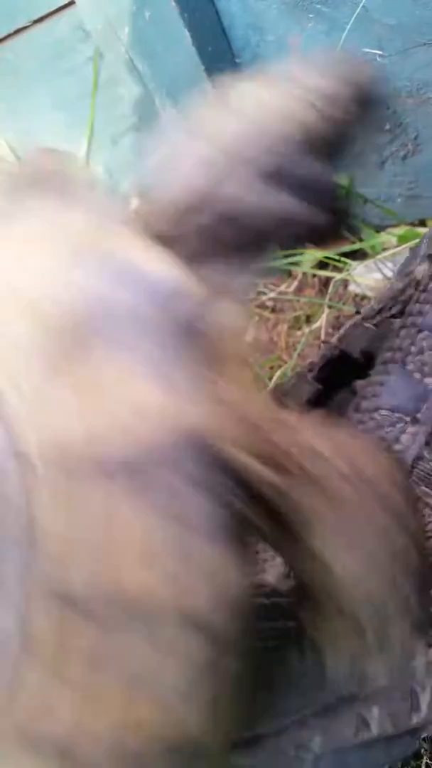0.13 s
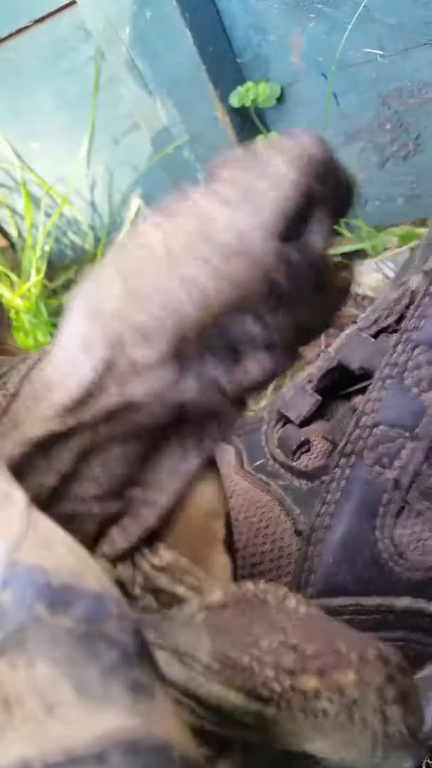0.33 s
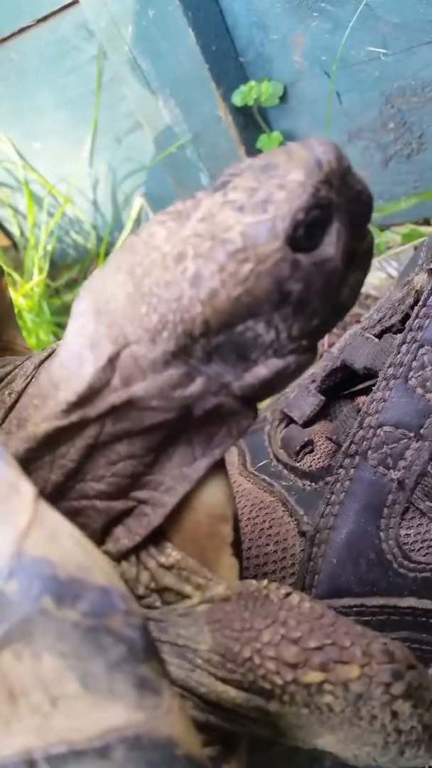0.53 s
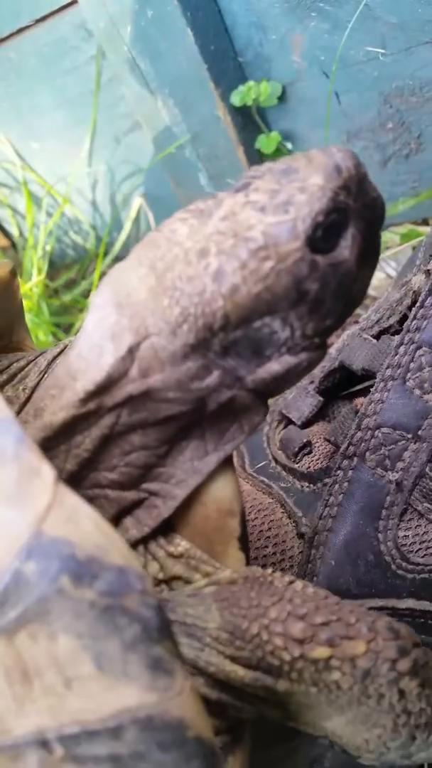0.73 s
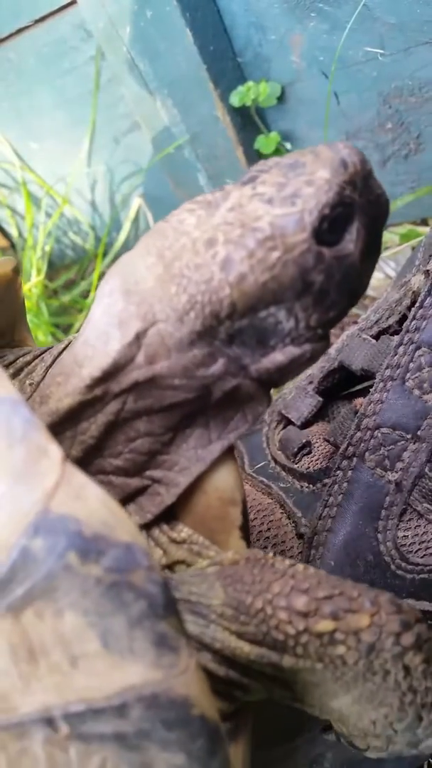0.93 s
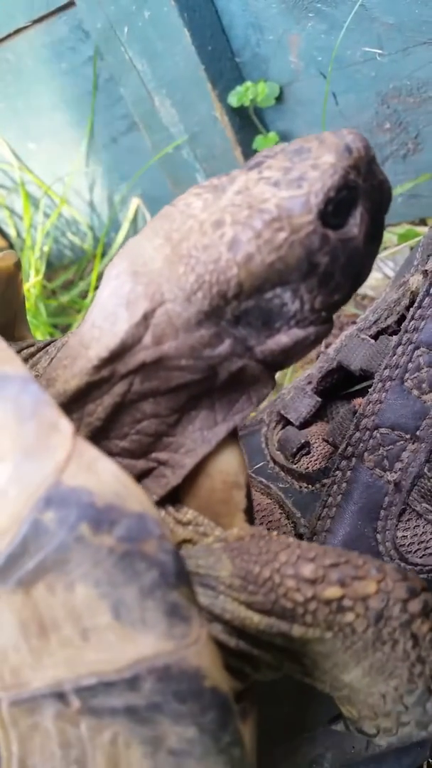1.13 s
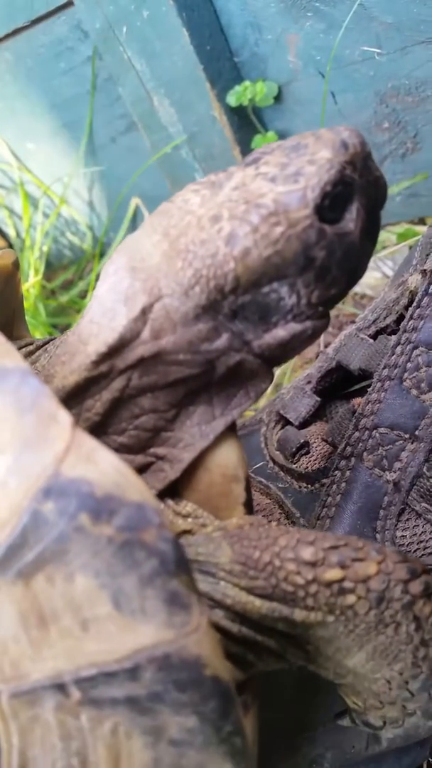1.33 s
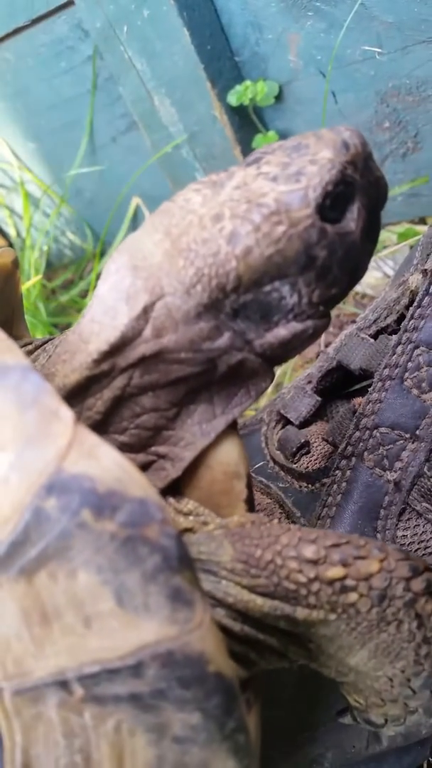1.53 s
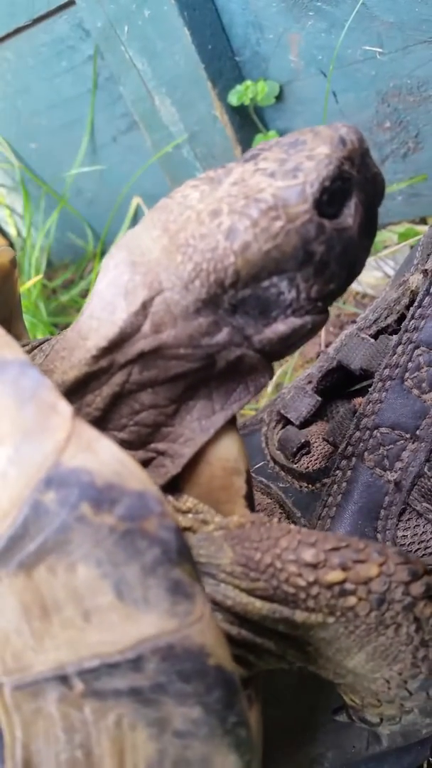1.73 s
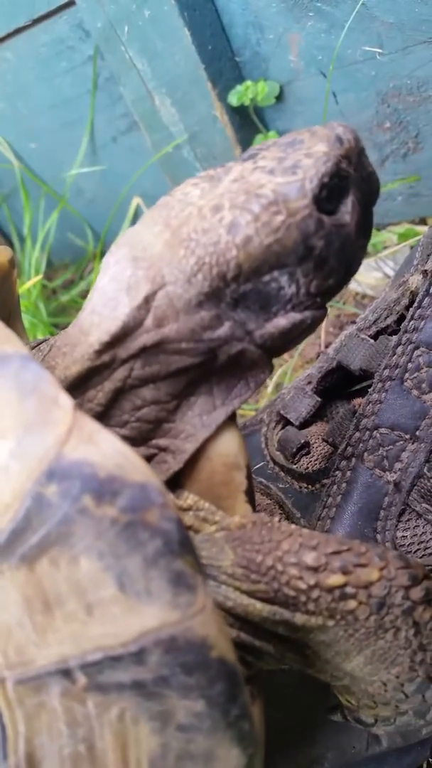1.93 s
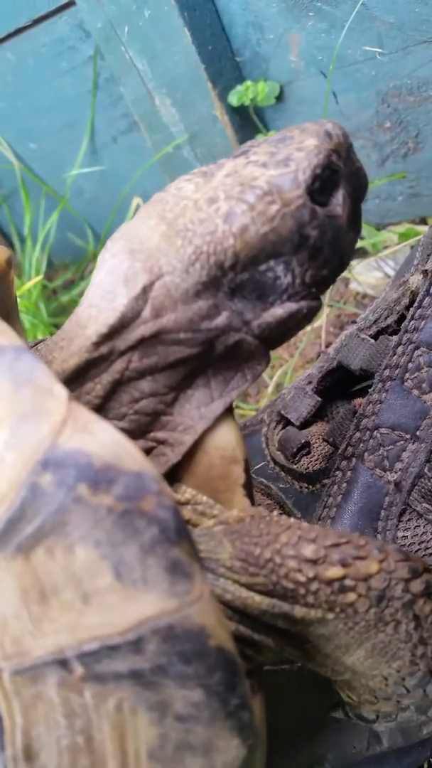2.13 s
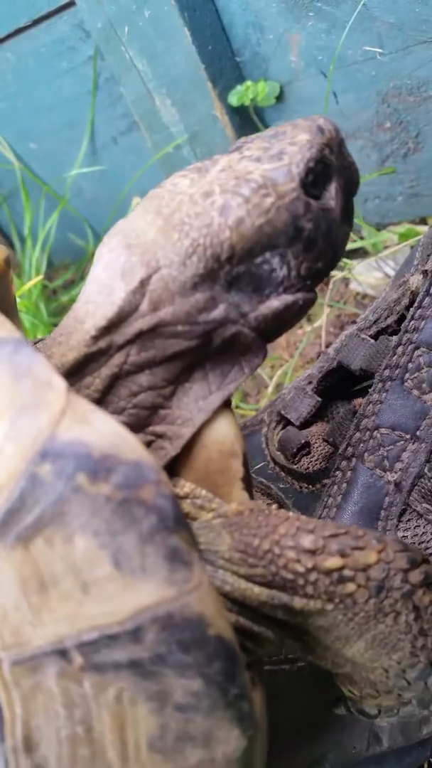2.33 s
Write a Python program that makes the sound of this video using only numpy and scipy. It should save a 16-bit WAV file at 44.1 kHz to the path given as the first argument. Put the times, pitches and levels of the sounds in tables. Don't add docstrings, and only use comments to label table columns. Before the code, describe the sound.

One close, nasal tortoise squeak slides down into spent breath, over faint birdsong and low rumble

```python
import sys
import numpy as np
from scipy import signal
from scipy.fft import rfft, irfft
from scipy.io import wavfile
from scipy.ndimage import uniform_filter1d

SR = 44100
rng = np.random.default_rng(int(sys.argv[2]) if len(sys.argv) > 2 else 0)


def int16_out(signal):
    q = np.round(np.clip(np.atleast_2d(signal).T, -1, 1) * 32767)
    wavfile.write(sys.argv[1], SR, q.astype(np.int16))


def volts_from_decibels(level):
    exponent = np.asarray(level, float) / 20
    return 10 ** exponent


N = 110250
TIME = np.arange(N) / SR
FREQ = np.arange(N // 2 + 1) * SR / N


def level(x, db):
    return x * volts_from_decibels(db) / np.sqrt(np.mean(x ** 2))


def along(table, at, column=1):
    return np.interp(at, np.array(table)[:, 0], np.array(table)[:, column])


def noise(colour):
    hz, db = np.array(colour).T
    gain = volts_from_decibels(np.interp(np.log(FREQ + 1), np.log(hz), db, left=-90, right=-90))
    white = rng.standard_normal(N)
    return level(irfft(rfft(white) * gain, N), 0)


def walk(rate):
    hold = int(SR / rate)
    steps = np.repeat(rng.standard_normal(N // hold + 1), hold)[:N]
    return 1.3 * uniform_filter1d(uniform_filter1d(steps, hold), hold)


def pan(x, db):
    return x * volts_from_decibels(np.array([[db], [-db]]) / 2)


# f/Hz, density/dB
TOWN_COLOUR = [(14, -43.5), (40, -13.5), (67, 3), (88, -8.5), (255, -16.5), (320, -23.5), (520, -27),
               (1500, -48.5), (1950, -68.5)]
# f/Hz, density/dB
HISS_COLOUR = [(470, -31.5), (800, -4), (2620, -18.5), (3360, -16), (5270, -19), (6680, -19), (7570, -46),
               (12900, -22), (15800, -16)]
# t/s, level/dB
RUMBLE_LEVEL = [(0, -57), (.12, -50.5), (.55, -52.5), (.9, -56), (1.13, -57), (1.19, -51), (1.36, -54.5),
                (1.45, -49), (1.6, -51), (1.98, -53.5), (2.07, -50.5), (2.12, -52), (2.17, -50),
                (2.22, -50.5), (2.29, -48), (2.5, -52.5)]
# t/s, level/dB
MURMUR_LEVEL = [(0, -57), (1.05, -56), (1.25, -63), (1.55, -60), (1.9, -63.5), (2.1, -62.5), (2.5, -62.5)]
TOWN_ALIKE, SPLIT_HZ = 0.67, 164
GUST_DB, GUSTS_PER_S = 0.78, 9.22
HISS_DB, HISS_LEFT_DB = -67.5, 2


def garden():
    common = np.sqrt((1 + TOWN_ALIKE) / 2) * noise(TOWN_COLOUR)
    opposed = np.sqrt((1 - TOWN_ALIKE) / 2) * noise(TOWN_COLOUR)
    town = rfft(common + opposed * np.array([[1], [-1]]))
    deep = 1 / (1 + (FREQ / SPLIT_HZ) ** 6)
    murmur = level(irfft(town * (1 - deep), N), 0)
    murmur = murmur * volts_from_decibels(along(MURMUR_LEVEL, TIME) + 0.5 * walk(13.82))
    rumble = level(irfft(town * deep, N), 3.6)
    rumble = rumble * volts_from_decibels(along(RUMBLE_LEVEL, TIME) + GUST_DB * walk(GUSTS_PER_S))
    hiss = np.array([noise(HISS_COLOUR), noise(HISS_COLOUR)])
    hiss = hiss * pan(0.63, HISS_LEFT_DB) * volts_from_decibels(walk(12.0))
    return rumble + murmur + hiss * volts_from_decibels(HISS_DB)


# t/s, length/s, start f/Hz, end f/Hz, level/dB
WHISTLES = [(0.109, 0.059, 5640, 5760, -68.5), (0.725, 0.025, 6100, 6800, -68),
            (0.745, 0.039, 6800, 6380, -76), (0.842, 0.12, 4170, 4223, -74.5),
            (1.0, 0.094, 4300, 4070, -83), (1.008, .12, 7900, 7770, -84), (1.12, 0.17, 7660, 7460, -90),
            (1.097, 0.027, 3900, 3900, -80.5), (1.227, 0.055, 5020, 4170, -74),
            (1.33, 0.038, 6680, 6600, -77), (1.413, 0.028, 4340, 5470, -76),
            (1.426, 0.094, 6510, 6080, -74), (1.557, 0.019, 4500, 5250, -77),
            (1.568, 0.11, 6310, 6410, -75), (1.712, 0.044, 6290, 6530, -72),
            (1.751, 0.092, 6150, 6330, -80), (1.725, 0.02, 3730, 3910, -77), (1.85, 0.015, 4650, 5000, -81),
            (1.865, 0.07, 6600, 6500, -78.5), (2.074, 0.23, 6710, 6790, -81.5),
            (2.23, 0.014, 5100, 5300, -81)]
WARBLE_HZ, BIRD_FLUTTER_DB, LEAF_ECHO_DB, BIRDS_DB = 60, 2.5, 2, -2.5


def birds():
    song = np.zeros(N)
    warble = WARBLE_HZ * walk(130)
    flutter = volts_from_decibels(BIRD_FLUTTER_DB * walk(60.12))
    for start, length, from_hz, to_hz, db in WHISTLES:
        u = np.clip((TIME - start) / length, 0, 1)
        hz = from_hz + (to_hz - from_hz) * u + warble
        swell = np.abs(np.sin(np.pi * u)) ** .5
        song += volts_from_decibels(db) * swell * np.sin(2 * np.pi * np.cumsum(hz) / SR)
    tail = rng.standard_normal((2, 4000)) * np.exp(-np.arange(4000) / 4700.0)
    tail *= volts_from_decibels(LEAF_ECHO_DB) / np.sqrt((tail ** 2).sum(axis=1, keepdims=True))
    echo = signal.fftconvolve(song[None], tail)[:, :N]
    return volts_from_decibels(BIRDS_DB) * (np.sqrt(2) * song * flutter + echo)


# t/s, length/s, level/dB, centre f/Hz, left minus right/dB
SCUFF_EVENTS = [
    (.148, .007, -63, 2500, 2),
    (.335, .05, -47, 1000, 0),
    (.4865, .004, -46, 1700, 6),
    (.845, .012, -76, 2600, 0),
    (.889, .025, -58, 500, 0),
    (1.46, .05, -62, 650, -2),
    (1.5, .13, -67, 900, 2),
    (1.68, .06, -77, 3500, 2),
    (2.03, .06, -58, 350, 0),
]


def scuffs():
    out = np.zeros((2, N))
    for start, length, db, hz, side_db in SCUFF_EVENTS:
        u = np.clip((TIME - start) / length, 0, 1)
        colour = [(hz / 5, -12), (hz, 0), (hz * 4, -22)]
        rub = np.array([noise(colour), noise(colour)])
        out += pan(rub, side_db) * volts_from_decibels(db + 2 * walk(180)) * np.sin(np.pi * u ** 0.55)
    return out


# t/s, f/Hz, fundamental level/dB, overtone tilt/dB per overtone
SQUEAK_PATH = [
    (.17, 671, -69, -1),
    (.177, 661, -43, 0.5),
    (.197, 618, -34, 0.02),
    (.235, 614, -28, 0),
    (.245, 570.4, -23.5, 0.14),
    (.33, 543.8, -23.5, 0),
    (.375, 515.7, -26, 0),
    (.416, 485, -31, -0.64),
    (.428, 482, -48, -6),
]
# level/dB, for four states of the glottis
TIGHT_GLOTTIS = [-5, -23, -22, -24, -24, -26, -36, -30, -42, -29, -53, -53]
OPEN_GLOTTIS = [-20, -23, -26, -32, -27, -38, -36, -29, -32, -43, -39, -49]
TIRED_GLOTTIS = [-16, -19, -17, -27, -14, -28, -31, -42, -28, -40, -36, -36]
SPENT_GLOTTIS = [-16, -15, -18, -33, -38, -26, -33, -40, -32, -40, -40, -40]
BREAK_S, BREAK_LENGTH_S = .24, .007
TIRES_S, TIRES_LENGTH_S = 0.3, 0.039
FADES_S, FADES_LENGTH_S = 0.361, 0.055
SHIMMER_DB, JITTER = .33, .0015


def squeak():
    phase = 2 * np.pi * np.cumsum(along(SQUEAK_PATH, TIME) * (1 + JITTER * walk(150))) / SR
    opened = np.clip((TIME - BREAK_S) / BREAK_LENGTH_S + .5, 0, 1)
    tired = np.clip((TIME - TIRES_S) / TIRES_LENGTH_S + .5, 0, 1)
    spent = np.clip((TIME - FADES_S) / FADES_LENGTH_S + .5, 0, 1)
    tilt = along(SQUEAK_PATH, TIME, column=3)
    tone = np.sin(phase)
    states = zip(TIGHT_GLOTTIS, OPEN_GLOTTIS, TIRED_GLOTTIS, SPENT_GLOTTIS)
    for k, (a, b, c, d) in enumerate(states, start=2):
        db = a + (b - a) * opened + (c - b) * tired + (d - c) * spent
        db = db + k * tilt + k * SHIMMER_DB * walk(42.8)
        tone = tone + volts_from_decibels(db) * np.sin(k * phase + k * k)
    sounding = (TIME > SQUEAK_PATH[0][0]) * (TIME < SQUEAK_PATH[-1][0])
    return np.sqrt(2) * tone * volts_from_decibels(along(SQUEAK_PATH, TIME, column=2)) * sounding


# f/Hz, width/Hz, level/dB
THROAT_MODES = [(3300, 470, 10.5), (6800, 810, 3.5), (7960, 350, -14), (9700, 400, -12), (12000, 1250, 11)]


def throat_db(hz):
    return sum(db / (1 + (2 * (hz - f) / width) ** 2) for f, width, db in THROAT_MODES)


# t/s, level/dB, brightness/dB
BREATH_PATH = [
    (.17, -90, -5.5),
    (.185, -58, -4),
    (.25, -49, -5),
    (.3, -46.5, 1.5),
    (.385, -39.5, 7),
    (.425, -45, 4.5),
    (.49, -44.5, -3),
    (.55, -59.5, -4),
    (.85, -77, -4),
]
# f/Hz, level/dB
AIR_COLOUR = [(300, 2.5), (900, -1.5), (1600, -6), (2900, -10.5), (5200, -4.5), (7200, -9.5), (9200, -18.5),
              (13000, -9.5), (16000, -17.5)]
AIR_FLUTTER_DB = 2.3


def breath():
    air = rfft(noise(AIR_COLOUR)) * volts_from_decibels(throat_db(FREQ))
    brightness = along(BREATH_PATH, TIME, column=2)
    out = 0
    for band in range(8):
        part = irfft(air * (FREQ // 2000 == band), N)
        treble = np.clip((band - 1) / 3, 0, 1)
        out = out + part * volts_from_decibels(treble * brightness + AIR_FLUTTER_DB * walk(35))
    sounding = (TIME > BREATH_PATH[0][0]) * (TIME < BREATH_PATH[-1][0])
    return out * volts_from_decibels(along(BREATH_PATH, TIME)) * sounding


# f/Hz, level/dB, lag/rad
PORT_TRANSFER = [(100, -1, .3), (547, 1, .5), (620, 2.5, 1), (1080, -5, 2.9), (1240, -6, 2.7),
                 (1650, -9, 4.4), (1850, -3, 5.2), (2120, -8, 4.3), (2250, 0, 4.5), (2480, -5, 5),
                 (2800, 1, 5.8), (3080, -2, 6.5), (3190, -8, 7.3), (3300, -7, 8.8), (3400, -9, 9),
                 (3700, -2, 13), (3950, 5, 11.8), (4350, -9, 15), (5000, 13, 15.4), (5110, 12, 14),
                 (5290, -3, 16.4), (5470, 3, 15.3), (5550, 10, 16.5), (5680, 6, 16.3), (6200, 2, 14),
                 (6800, -8, 19), (11570, -11, 34), (15200, -5, 37)]
AIR_ALIKE = .6


def tortoise():
    voice, air = squeak(), breath()
    other = AIR_ALIKE * air + np.sqrt(1 - AIR_ALIKE ** 2) * breath()
    shade = volts_from_decibels(along(PORT_TRANSFER, FREQ))
    lag = np.exp(-1j * along(PORT_TRANSFER, FREQ, column=2))
    right = (rfft(voice) * shade + rfft(other) * np.minimum(shade, 1)) * lag
    return np.array([voice + air, irfft(right, N)])


# t/s, peak level/dB, f/Hz, t60/s, left minus right/dB
SHELL_KNOCKS = [(.234, -25, 178, 0.022, -7.5), (.244, -27.5, 105.6, .1, 15.5), (0.268, -21, 102, .1, 11),
                (0.349, -34, 262, 0.13, 12), (0.357, -24, 155.6, 0.022, 9.5), (0.377, -29, 98.5, 0.14, 8),
                (0.414, -28, 79.45, 0.097, 5), (0.433, -21, 89, 0.055, 8), (0.4871, -27.5, 470, 0.0091, 23),
                (0.489, -34, 111.4, 0.083, 16.5), (.892, -43, 436, 0.057, -6),
                (.899, -46.5, 442, 0.059, -1), (.893, -52, 693, 0.059, -2), (.936, -33.5, 166, 0.08, 3.5),
                (0.9431, -33.5, 158, 0.099, 6), (0.963, -43.5, 225, 0.085, 2),
                (0.963, -33.5, 76.3, 0.32, 3.5), (1.361, -34.5, 185.4, 0.1, 4.5),
                (1.385, -33, 185, 0.079, 2.5), (1.464, -46, 550, 0.028, 3), (1.4715, -43.5, 479, .04, -7),
                (1.483, -45, 436, 0.071, -1), (2.03, -47, 189.3, 0.25, 0), (2.055, -47.5, 404, 0.074, -5)]
BUMP_SAG, BUMP_RISE_TURNS = 0.11, 0.21


def bumps():
    out = np.zeros((2, N))
    for start, db, hz, t60, side_db in SHELL_KNOCKS:
        t = np.maximum(TIME - start, 0)
        fade = np.exp(-np.log(1000) * t / t60)
        pitch = hz * (1 + BUMP_SAG * (2 * fade - 1)) * (t > 0)
        ring = np.sin(2 * np.pi * np.cumsum(pitch) / SR)
        rise = 1 - np.exp(-t * hz / BUMP_RISE_TURNS)
        out += pan(-volts_from_decibels(db) * ring * fade * rise, side_db)
    return out


# t/s, length/s, f/Hz, unsteadiness (fraction of pitch)
WHEEZE_EVENT = (1.51, .11, 590, .04)
WHEEZE_PARTIALS = [-67, -72, -72, -80]


def wheeze():
    start, length, hz, unsteady = WHEEZE_EVENT
    phase = 2 * np.pi * np.cumsum(hz * (1 + unsteady * walk(200))) / SR
    reed = 0
    for k, db in enumerate(WHEEZE_PARTIALS, start=1):
        reed = reed + volts_from_decibels(db + 2.9 * walk(90)) * np.sin(k * phase)
    u = np.clip((TIME - start) / length, 0, 1)
    return pan(np.sqrt(2) * reed * np.sin(np.pi * u ** 0.73), 1.5)


def scene():
    return garden() + birds() + scuffs() + tortoise() + bumps() + wheeze()


def band_limit(x):
    return signal.sosfilt(signal.butter(12, 16050, fs=SR, output="sos"), x)


def record(dry):
    return band_limit(dry)


dry = scene()
out = record(dry)
int16_out(out)
```